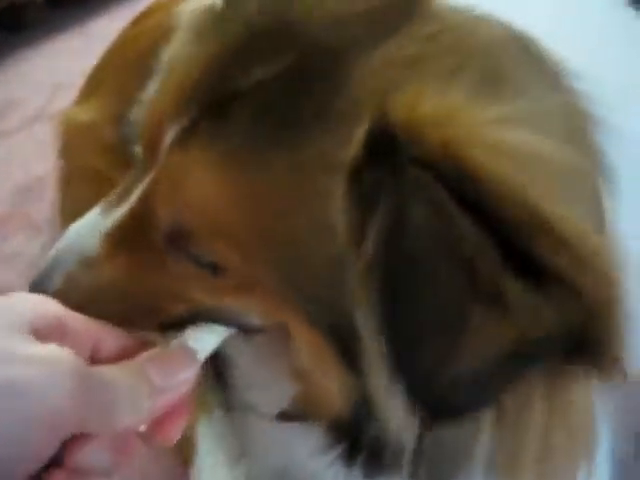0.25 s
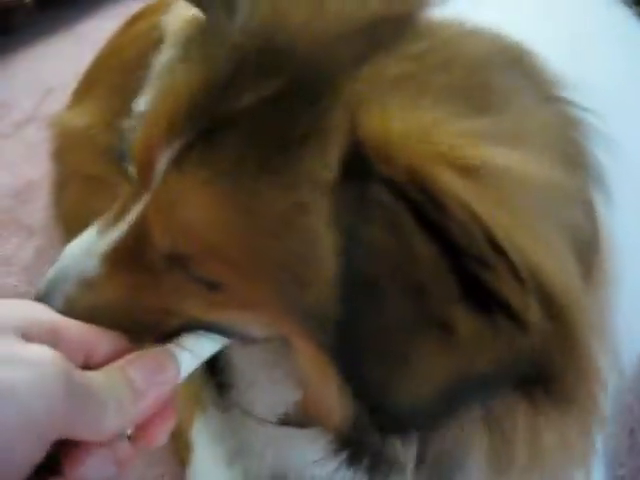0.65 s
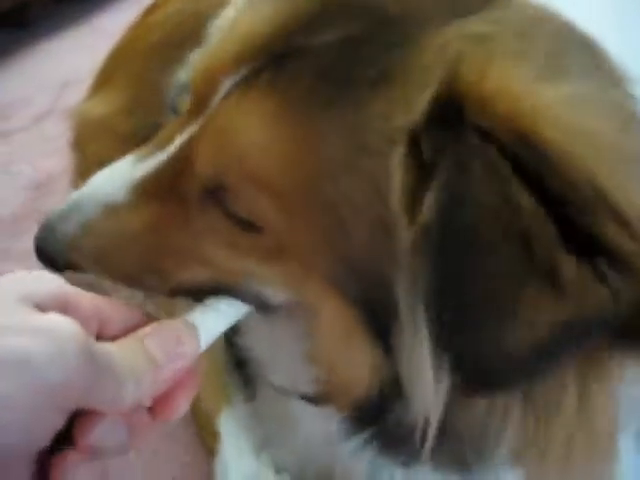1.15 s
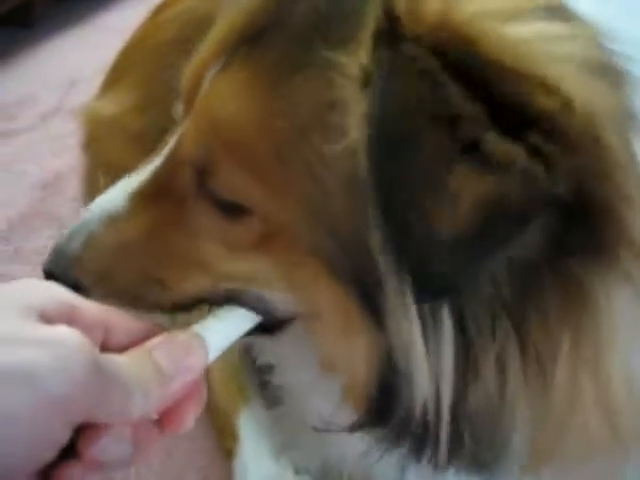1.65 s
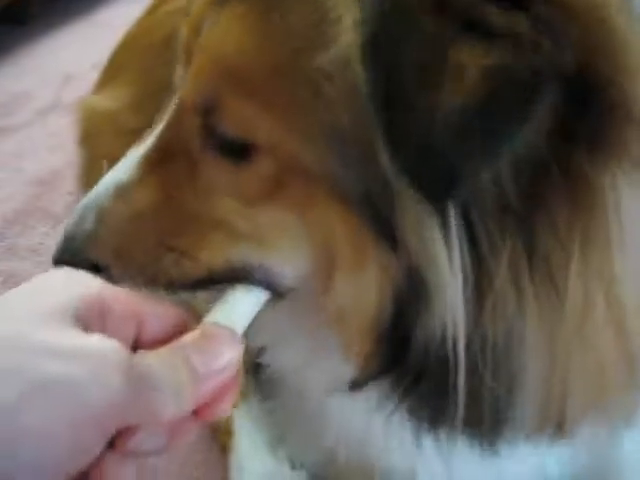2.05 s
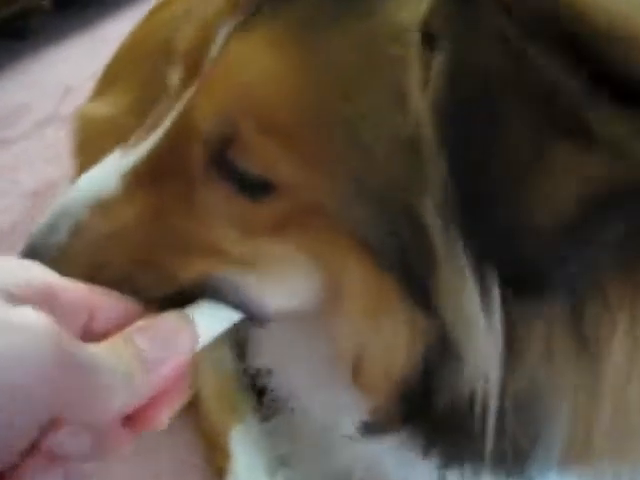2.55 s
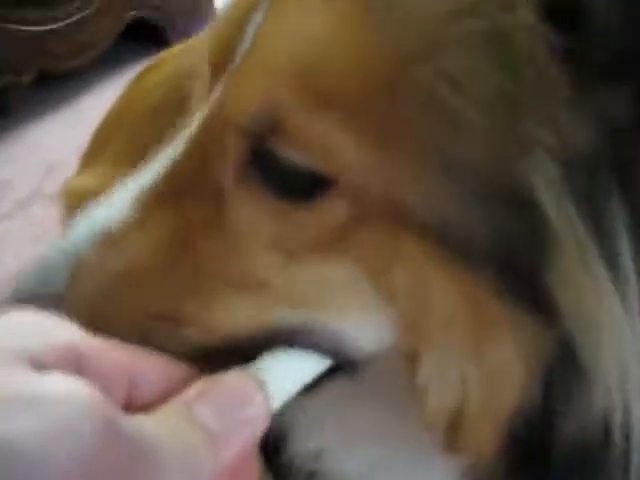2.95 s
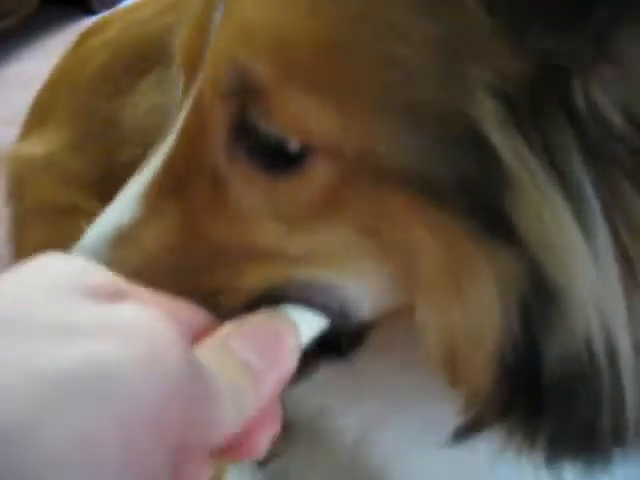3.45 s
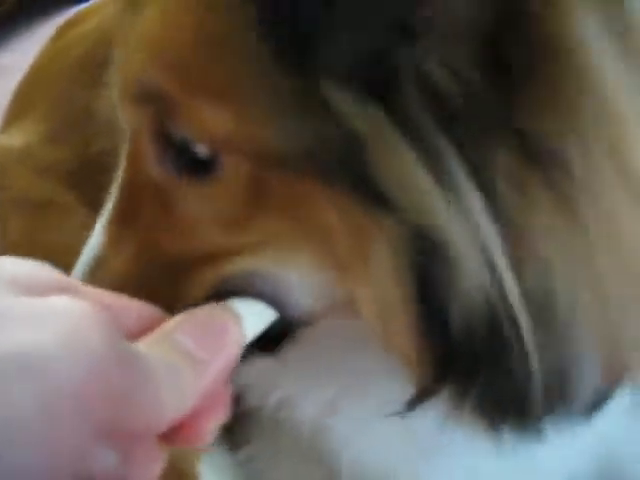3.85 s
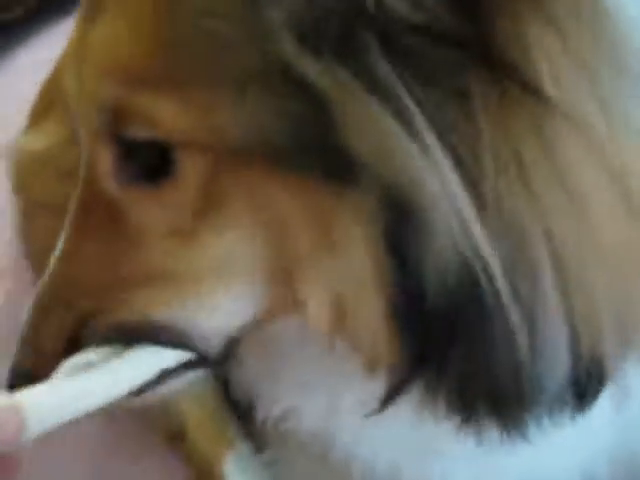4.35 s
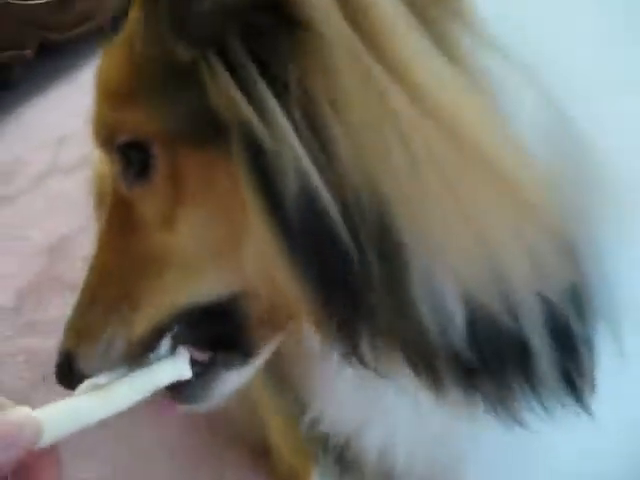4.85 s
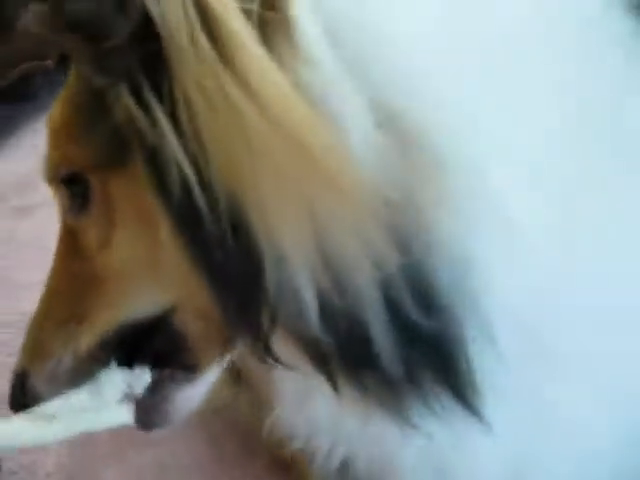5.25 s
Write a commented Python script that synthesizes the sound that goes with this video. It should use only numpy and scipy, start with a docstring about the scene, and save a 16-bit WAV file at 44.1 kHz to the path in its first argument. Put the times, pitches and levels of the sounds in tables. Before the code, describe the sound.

A dog gnaws a rawhide chew held in a hand. Sparse sticky pops and light cracks lead to sharp, woody crunches at irregular intervals, each with a short scrape beforehand and some with a low jaw thud. Later the open mouth gives bright saliva clicks, then hair brushes softly. Close, dry indoor sound with low hiss and a faint hum.

```python
"""Wet smacks and small dry cracks come first, over faint hum and hiss; then hard crunches break in.
A dog gnaws a rawhide stick held out by a hand, close to a small microphone in a quiet furnished room.
Fractures of the hide are sudden pushes that ring the mouth; saliva films pop in tiny air pockets.
Scraping teeth are dense clicks, the jaw knock is a damped thud, and saliva crackles finely throughout.
At the end fur rustles as the head pulls away: filtered sparse impulses, like the hairs themselves."""
import sys
import numpy as np
from scipy import signal
from scipy.fft import rfft, irfft
from scipy.io import wavfile

SR = 44100
rng = np.random.default_rng(int(sys.argv[2]) if len(sys.argv) > 2 else 0)


def wrap_up_sound(samples):
    """Save the sound to the file named by the first command line argument, as 16-bit audio."""
    columns = np.atleast_2d(samples).T
    # keep every value between -1 and 1, then stretch to whole-number steps
    tamed = np.clip(columns, -1, 1)
    steps = np.round(tamed * 32767).astype(np.int16)
    wavfile.write(sys.argv[1], SR, steps)


N = 242991
T = np.arange(N) / SR  # s
CLICK_T = np.arange(2048) / SR  # s, the time axis of one click


def undb(db):
    """Decibels to gain."""
    return 10 ** (np.asarray(db) / 20)


def unit(x):
    """Scale to rms 1."""
    return x / np.sqrt(np.mean(x ** 2))


def curve(rows):
    """Gain over time, interpolated in dB between rows of seconds and dB."""
    seconds, db = np.transpose(rows)
    return undb(np.interp(T, seconds, db))


def ramp(start_s, rise_s):
    """Rises from 0 to 1 and stays there."""
    return np.clip((T - start_s) / rise_s, 0, 1)


def decay(t, t60):
    """Exponential decay that falls by 60 dB in t60 seconds."""
    return np.exp(-np.log(1000) * t / t60)


def add(out, s, x):
    """Mix x into out from time s on."""
    start = max(int(s * SR), 0)
    out[start:start + len(x)] += x[:max(N - start, 0)]


def colour(x, points, size=2048):
    """Causal minimum-phase filter with the given outline in Hz and dB, built from the cepstrum."""
    hz, db = np.transpose(points)
    bins_hz = np.fft.rfftfreq(size, 1 / SR)
    log_gain = np.log(undb(np.interp(np.log(bins_hz + 1), np.log(hz), db)))
    cepstrum = irfft(log_gain)
    # folding the second half onto the first makes the response causal
    cepstrum[1:size // 2] *= 2
    cepstrum[size // 2 + 1:] = 0
    response = irfft(np.exp(rfft(cepstrum)))
    return signal.fftconvolve(x, response)[:len(x)]


def cavity(x, hz, q):
    """A resonance applied twice, so its skirts are steep."""
    s = 1j * np.fft.rfftfreq(len(x), 1 / SR) / hz
    bandpass = s / q / (s * s + s / q + 1)
    return irfft(rfft(x) * bandpass ** 2, len(x))


def grains(size, rate, spread_db):
    """Sparse random impulses, on average rate per second, mostly small and a few large."""
    chance = rng.random(size)
    sign = rng.choice([-1, 1], size)
    strength = np.minimum(rng.exponential(size=size), np.pi)
    return (chance < rate / SR) * sign * undb(spread_db * strength)


# Spectrum of the smaller releases that trail a sudden one. Each row: frequency in Hz, gain in dB.
SPLINTER_COLOUR = [(600, 4), (2000, -5.5), (4000, 6), (12000, -6.5)]


def release(splinter_db, splinter_s):
    """A sudden release of stress is one impulse, trailed by a dying spray of coloured noise."""
    spray = rng.standard_normal(len(CLICK_T)) * np.exp(-CLICK_T / splinter_s)
    push = undb(splinter_db) * unit(colour(spray, SPLINTER_COLOUR))
    push[0] += np.sqrt(len(push))  # an impulse of rms 1
    return push


# Spectrum of the sound that escapes without ringing a cavity. Each row: frequency in Hz, gain in dB.
SNAP_COLOUR = [(100, -16), (300, -1.5), (750, -12), (1200, 5), (3000, 7.5), (4200, 5.5), (6000, 1.5),
               (9500, 7), (13000, -5), (16000, -36)]


def click(push, db, hz, q, snap_db):
    """A push rings a cavity; part of it escapes directly as a broadband snap, snap_db re the ring."""
    ring = unit(cavity(push, hz, q))
    snap = undb(snap_db) * unit(colour(push, SNAP_COLOUR))
    per_3_ms = np.sqrt(.003 * SR / len(push))  # db states the click's energy as a level over 3 ms
    return undb(db) * unit(ring + snap) * per_3_ms


# Spectrum of the room rumble and microphone hiss. Each row: frequency in Hz, relative level in dB.
AMBIENCE_COLOUR = [(20, -12), (45, -5.5), (70, -6.5), (90, -5.5), (120, -5.5), (240, -4.5), (450, -5.5),
                   (800, -6.5), (1400, -9.5), (3400, -11), (5000, -15.5), (10000, -17), (15500, -20)]
AMBIENCE_DB = -54
# A distant appliance hums in the room. Each row: time in seconds, level in dB.
HUM_LEVEL = [(0, -68.5), (1.8, -67.5), (2.2, -74), (5.51, -71.5)]
HUM_HZ = 90


def background():
    """Steady room rumble and microphone hiss, with narrow noise as a wavering low hum."""
    hiss = undb(AMBIENCE_DB) * unit(colour(rng.standard_normal(N), AMBIENCE_COLOUR))
    hum = curve(HUM_LEVEL) * unit(cavity(rng.standard_normal(N), HUM_HZ, q=3.2))
    return hiss + hum


# How the walls of the furnished room colour their reply. Each row: frequency in Hz, gain in dB.
ROOM_COLOUR = [(100, 1.5), (700, -2), (1350, 2), (1800, -7), (2400, 0.5), (4300, 1), (5500, 0.5),
               (10000, -4), (16000, 1)]


def room(x, near_db=-12, near_s=0.0053, tail_db=-14, t60=0.23, gap_s=0.0045):
    """Hand and floor scatter the sound almost at once; the walls answer with a short tail."""
    t = T[:SR // 2]
    near = rng.standard_normal(len(t)) * np.exp(-t / near_s) * (t > .0012)
    tail = rng.standard_normal(len(t)) * decay(t, t60) * (t > gap_s)
    response = undb(near_db) * unit(near) + undb(tail_db) * colour(unit(tail), ROOM_COLOUR)
    return x + signal.fftconvolve(x, response / np.sqrt(len(t)))[:N]


# Fur brushing past near the microphone. Each row: time in seconds, level in dB before gain and fade-in.
FUR_LEVEL = [(5.2, -67), (5.274, -50), (5.384, -50.5), (5.5, -49.5)]
# Spectrum of the brushing hairs. Each row: frequency in Hz, gain in dB.
FUR_COLOUR = [(300, -28), (1200, -4.5), (2300, 0.5), (5500, -2.5), (9000, -10), (16000, -14)]
FUR_S, FUR_RISE_S, FUR_DB = 5.27, 0.083, 0.5  # its start, fade-in and gain


def fur():
    """Countless hairs flick past each other as the head pulls away."""
    hairs = unit(colour(grains(size=N, rate=3000, spread_db=5.0), FUR_COLOUR))
    return undb(FUR_DB) * curve(FUR_LEVEL) * ramp(FUR_S, FUR_RISE_S) * hairs


SALIVA_DB = -67.5  # while the jaws are closed on the stick
OPEN_S, OPEN_RISE_S, OPEN_DB = 4.42, .08, 4.5  # the mouth opens: start, rise time and added level


def saliva():
    """Fine wet crackle from pockets of two sizes, louder once the mouth is open."""
    large = cavity(grains(size=N, rate=14, spread_db=2.5), hz=4960, q=1.9)
    small = cavity(grains(size=N, rate=87, spread_db=2.5), hz=10900, q=1.0)
    level_db = SALIVA_DB + OPEN_DB * ramp(OPEN_S, OPEN_RISE_S)
    return undb(level_db) * unit(unit(large) + 1.26 * unit(small))


# Other scrapes and brief rubs, apart from the slides before bites; the first row is the short,
# lower body of a wet smack. Each row: start in seconds, length in seconds,
# level of the ring halfway in dB, resonance in Hz, its Q.
SCRAPES = [(0.445, 0.016, -44.5, 2210, 3.8), (0.707, .093, -56, 2300, 0.4), (1.471, 0.43, -57.5, 1390, 2.6),
           (1.938, 0.064, -42, 2040, 10), (1.934, 0.063, -47, 3680, 1.2), (2.925, 0.097, -57, 2580, 0.72),
           (3.761, 0.06, -53, 2960, 4.7), (4.077, 0.17, -56, 1450, 0.57), (4.472, 0.084, -53.5, 1320, 1)]
SLIDE_DB, SLIDE_HZ, SLIDE_Q = -53.5, 1390, 0.56  # the tooth slides into place before each break


def scrapes(snap_db=-6):
    """Stick and slip of teeth, and one smack's lower body: dense tiny clicks that swell and fade."""
    out = np.zeros(N)
    before_bites = [(s - slide_s, slide_s, SLIDE_DB, SLIDE_HZ, SLIDE_Q) for s, *_, slide_s in BITES]
    for s, length, db, hz, q in list(SCRAPES) + before_bites:
        clicks = grains(size=SR // 2, rate=900, spread_db=4.0)
        sound = unit(cavity(clicks, hz, q)) + undb(snap_db) * unit(colour(clicks, SNAP_COLOUR))
        progress = np.minimum(T[:len(clicks)] / length, 1)
        swell = 2 * np.sqrt(progress * (1 - progress))  # peaks at 1 halfway
        add(out, s, undb(db) * sound * swell)
    return out


def pop(db, hz, q, snap_db):
    """One film of saliva bursts and rings its air pocket."""
    return click(release(splinter_db=9.5, splinter_s=0.0015), db, hz, q, snap_db)


# Saliva films popping at lips and tongue. Each row: start in seconds, level in dB over 3 ms,
# air pocket resonance in Hz, its Q, broadband snap in dB re the ring.
SMACKS = [(.0227, -49.5, 5400, 4.5, -5), (0.1665, -43, 5800, 4.8, -7), (0.4368, -33.5, 5170, 2.6, -4),
          (0.4515, -32, 5300, 3.5, -1), (.5222, -47, 5580, 6, -18), (0.8323, -37.5, 3670, 6.8, 19),
          (1.0097, -33.5, 4640, 3.8, -10), (1.04, -38, 5400, 9.3, -4.5), (1.278, -25, 6100, 5.7, -6),
          (1.475, -38.5, 11400, 4.5, -1), (1.4809, -28.5, 4330, 5.1, -11.5), (1.5119, -30.5, 3900, 1.7, -2),
          (1.7462, -33, 3900, 0.81, -18), (2.0341, -36.5, 3900, 1.2, 8), (2.117, -44, 8650, 2.9, -6),
          (2.1553, -44, 10500, 5, -2), (2.2035, -40, 3480, 1.2, 5), (2.256, -41, 3820, 0.89, 21),
          (2.6589, -30.5, 6000, 9.3, -10), (2.9109, -39, 5300, 0.3, -18), (2.939, -42.5, 12810, 6, -9),
          (3.0463, -47, 5060, 1.5, 3), (4.464, -43, 12200, 1.3, -16), (4.57, -41.5, 6450, 6.8, 0),
          (4.6918, -25, 10900, 1.5, -13.5), (4.6942, -28.5, 9700, 4.9, -27), (4.7187, -44, 12070, 3, -10),
          (4.7753, -32.5, 7000, 1.2, -8.5), (4.8649, -46, 11100, 1.7, -7), (4.937, -43.5, 4600, 2.2, -1),
          (5.2435, -43, 9750, 2.8, -12)]
# Tiny pops after each smack: longest delay, level over 3 ms, scatter in pitch either way, Q.
DROPLET_S, DROPLET_DB, DROPLET_OCT, DROPLET_Q = 0.037, -52, .6, 2.0


def smacks(droplet_snap_db=-4, count=2):
    """Each film pops, and a few tiny droplets burst after it."""
    out = np.zeros(N)
    for s, db, hz, q, snap_db in SMACKS:
        add(out, s, pop(db, hz, q, snap_db))
        for delay, detune in rng.random((count, 2)):
            droplet_hz = hz * 2 ** (DROPLET_OCT * (2 * detune - 1))
            droplet = pop(DROPLET_DB, droplet_hz, DROPLET_Q, droplet_snap_db)
            add(out, s + DROPLET_S * delay, droplet)
    return out


KNOCK_HZ, KNOCK_SNAP_DB = 403, -22  # pitch of the jaw knock; its broadband snap re the ring


def knocks(q=0.48):
    """The jaw jolts shut at each break: a heavily damped low thud."""
    out = np.zeros(N)
    for s, db, *_, knock_db, slide_s in BITES:
        jolt = release(splinter_db=-10, splinter_s=0.0047)
        add(out, s, click(jolt, db + knock_db, KNOCK_HZ, q, KNOCK_SNAP_DB))
    return out


LEAD_S = .008  # fibres start to tear this long before each fracture
# Spectrum of the tearing fibres. Each row: frequency in Hz, gain in dB.
TEAR_COLOUR = [(400, 13), (1300, -12), (3500, -1.5), (7000, 3), (14000, -10)]


def fracture(splinter_db, tear_db=-16, tear_s=0.009):
    """Fibres tear louder and louder for a moment; then the hide lets go with a sharp edge."""
    t = T[:int(LEAD_S * SR)]
    growth = np.exp((t - LEAD_S) / tear_s)
    tearing = unit(colour(rng.standard_normal(len(t)), TEAR_COLOUR) * growth)
    snap = release(splinter_db, splinter_s=0.0013)
    same_energy = np.sqrt(len(snap) / len(t))  # tear_db compares energies, not rms
    return np.concatenate([undb(tear_db) * tearing * same_energy, snap])[:len(snap)]


# Hard bites that break the hide. Each row: time of the break in seconds, level in dB over 3 ms before
# the muzzle, mouth resonance in Hz, its Q, broadband snap in dB re the ring, run-up in seconds,
# first fracture in dB re the break, jaw knock in dB re the break, slide beforehand in seconds.
BITES = [(1.278, -13, 2000, 1.54, -7.5, 0.0044, -17, -17, 0.11),
         (1.9836, -28, 2070, 1.4, -5, 0.037, -13, -35, .11),
         (2.4195, -25.5, 2100, 0.85, -29, .0135, -14, -18, .05),
         (2.623, -23, 1650, 1.3, -4.5, 0.0069, -9.5, -16.5, 0.067),
         (3.1756, -16.5, 2080, 0.88, -9.5, .0026, -2.5, -30, 0.043),
         (3.5542, -28.5, 2670, 2.8, 5, 0.0059, -10, -34, 0.027),
         (3.7515, -14.5, 1970, 1.18, -13.5, 0.0065, -14, -17.5, .085)]
RUN_UNIT_S = .003  # a run-up holds one more fracture at 1, 4, 9 times this length
RUN_GROWTH, RUN_JITTER = 0.63, .2  # share of the way (in dB) to full strength; scatter re one gap
RUN_SNAP_DB, PITCH_SCATTER_OCT = 9, 0.12  # early fractures are brighter, and each rings differently
AFTER_S, AFTER_DB, AFTER_HZ = 0.0051, -19, 3300  # the last fibres part just after, level re the break
BREAK_SPLINTER_DB, SMALL_SPLINTER_DB = -1, -1.5  # spray re the impulse: the break, and small fractures


def bite(s, db, hz, q, snap_db, run_s, first_db):
    """Growing fractures, the break, a small last one: rows of s, dB, Hz, Q, snap dB, splinter dB."""
    count = 1 + int(np.sqrt(run_s / RUN_UNIT_S))
    rows = [(s, db, hz, q, snap_db, BREAK_SPLINTER_DB),
            (s + AFTER_S, db + AFTER_DB, AFTER_HZ, q, snap_db, SMALL_SPLINTER_DB)]
    for k, (shift, detune) in enumerate(rng.uniform(-0.91, 1, (count, 2))):
        progress = (k + RUN_JITTER * shift * (k > 0)) / count  # the first one is on time
        start = s - run_s * (1 - progress)
        level_db = db + first_db * (1 - RUN_GROWTH * progress)
        ring_hz = hz * 2 ** (PITCH_SCATTER_OCT * detune)
        rows.append((start, level_db, ring_hz, q, snap_db + RUN_SNAP_DB, SMALL_SPLINTER_DB))
    return rows


# Narrow resonances that linger after a crack.
# Each row: frequency in Hz, time to fall by 60 dB in seconds, relative level in dB.
RINGS = [(1100, 0.047, 24), (1380, 0.8, -26), (2340, 0.13, -25), (2436, 0.048, 12), (2900, 0.14, 28),
         (3420, 0.29, -28), (3630, 0.12, -31), (4285, 0.053, 15), (6090, .08, -9)]


def linger(x):
    """The faint narrow ringing that a crack leaves behind: a sum of decaying sines."""
    t = T[:SR // 3]
    response = np.zeros(len(t))
    for hz, t60, db in RINGS:
        response += undb(db) * unit(np.sin(2 * np.pi * hz * t) * decay(t, t60))
    return signal.fftconvolve(x, unit(response) / np.sqrt(len(t)))[:N]


# Lone cracks of lighter gnawing. Each row: time in seconds, level in dB over 3 ms before the muzzle,
# mouth resonance in Hz, broadband snap in dB re the ring.
CRACKS = [(.655, -45, 1290, -24), (0.742, -39, 2200, -13), (0.7693, -36.5, 1540, -2.5),
          (.909, -41, 2860, -20), (1.1577, -38, 2160, 9), (1.1652, -44, 1400, -4),
          (1.217, -42.5, 1430, -20), (1.6249, -40.5, 2290, -22), (1.7924, -28, 2780, 16),
          (1.9, -32, 2210, 3), (2.5646, -39, 1710, 11), (2.6304, -27.5, 1560, 25), (2.776, -37, 2940, -24),
          (3.2978, -37.5, 3970, 0), (3.557, -36, 1450, -19), (3.6624, -40, 2240, 1), (3.6687, -35, 3030, 2),
          (3.6779, -36, 2580, 14), (3.713, -36.5, 1870, -19), (3.7277, -34, 2110, -10),
          (4.0211, -39.5, 1470, -24), (4.0922, -39, 1250, -37.5), (4.1, -43, 1490, -23),
          (4.13, -41, 2470, -22), (4.2871, -39, 2110, -16), (4.5376, -41, 810, -14), (4.5636, -42, 1170, 9),
          (4.7093, -40.5, 2900, -12), (4.9771, -42, 1210, -2), (5.0554, -47.5, 2480, 0)]
# How the muzzle colours the sound on its way out. Each row: frequency in Hz, gain in dB.
MUZZLE_COLOUR = [(100, -8), (500, 3.5), (780, -3), (1080, -1), (1330, 7), (1600, -3), (2100, 1.5),
                 (2700, -2), (3300, 0.5), (4100, -1), (5000, -4), (6300, 2.5), (9500, -4), (15000, 12)]
MOUTH_Q, LINGER_DB = 1.32, -27  # sharpness of the mouth for lone cracks; gain of the lingering ring


def cracks():
    """Each fracture rings the mouth; the sound leaves through the muzzle and rings on faintly."""
    out = np.zeros(N)
    fractures = [(s, db, hz, MOUTH_Q, snap_db, SMALL_SPLINTER_DB) for s, db, hz, snap_db in CRACKS]
    for *breaking, knock_db, slide_s in BITES:
        fractures += bite(*breaking)
    for s, db, hz, q, snap_db, splinter_db in fractures:
        add(out, s - LEAD_S, click(fracture(splinter_db), db, hz, q, snap_db))
    out = colour(out, MUZZLE_COLOUR)
    return out + undb(LINGER_DB) * linger(out)


def scene():
    """The chewing dog in its room."""
    dog = cracks() + knocks() + smacks() + scrapes() + saliva() + fur()
    return (room(dog) + background())[None]


NOTCH_HZ, TOP_HZ = 7930, 15900


def record(dry, notch_q=4.26):
    """The recorder has a deep notch in the treble and cuts the top steeply."""
    b, a = signal.iirnotch(NOTCH_HZ, notch_q, fs=SR)
    notched = signal.lfilter(b, a, dry)
    top_cut = signal.ellip(8, .2, 70, TOP_HZ, fs=SR, output="sos")
    return signal.sosfilt(top_cut, notched)


dry = scene()
out = record(dry)
wrap_up_sound(out)
```